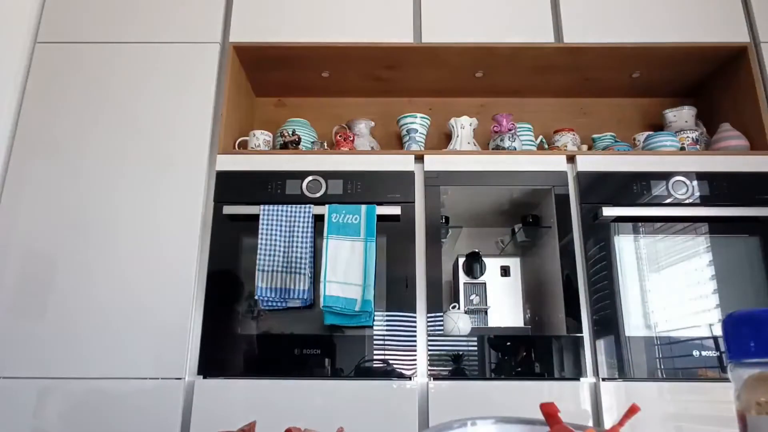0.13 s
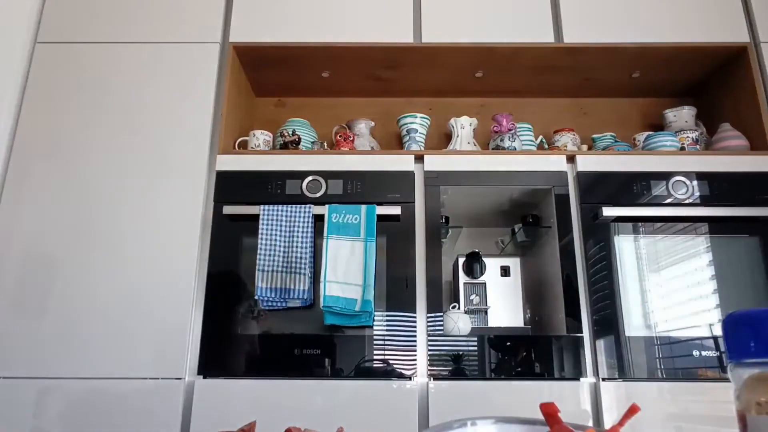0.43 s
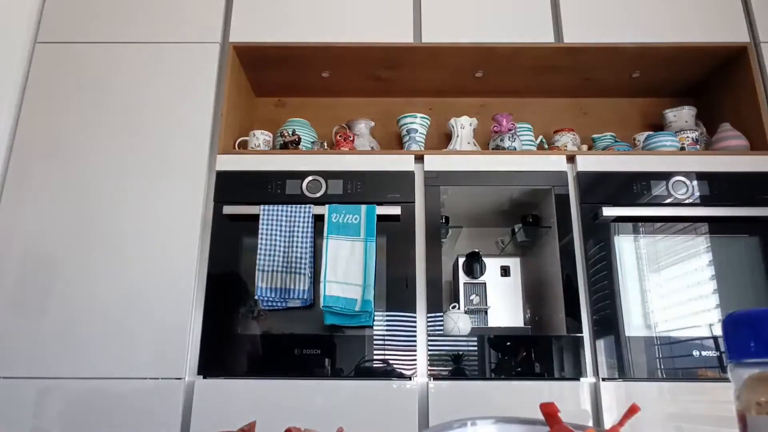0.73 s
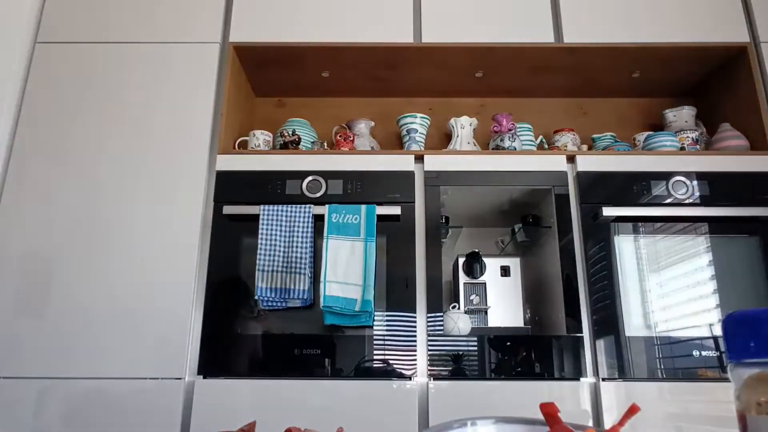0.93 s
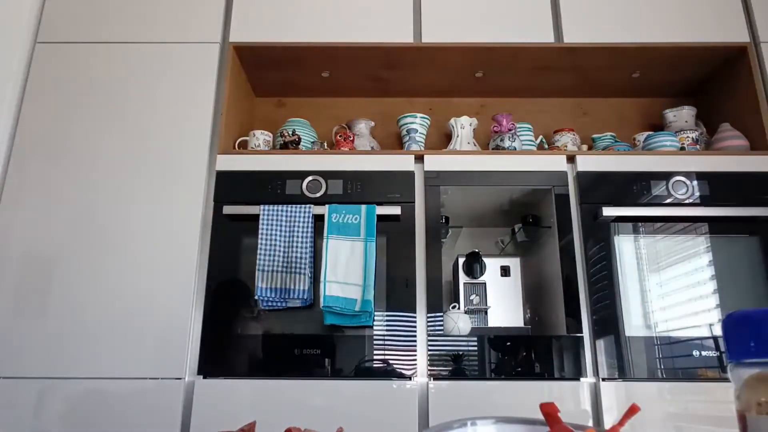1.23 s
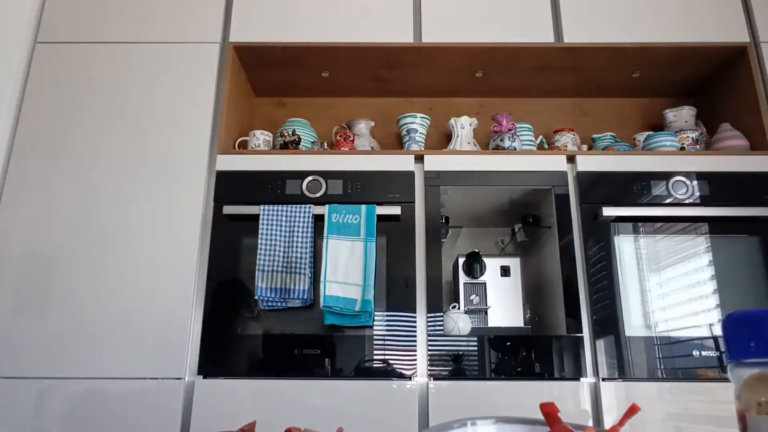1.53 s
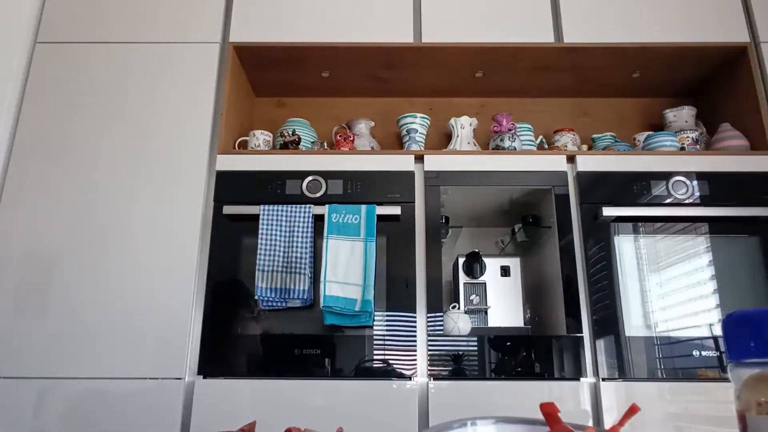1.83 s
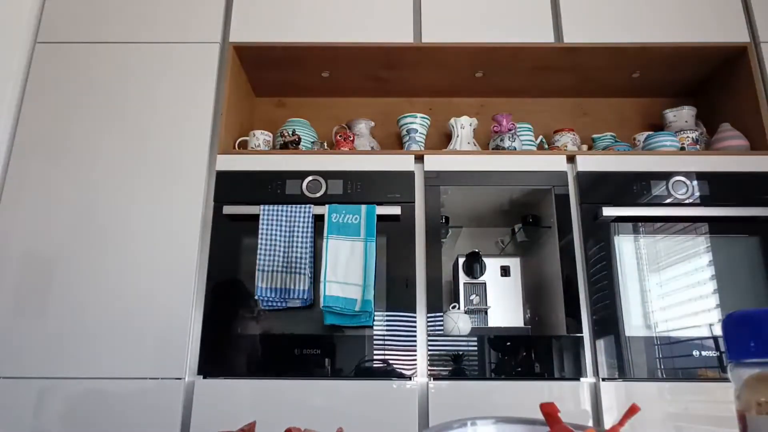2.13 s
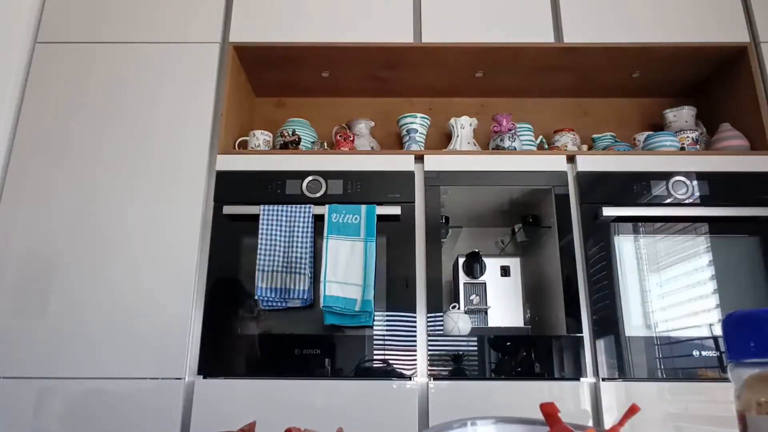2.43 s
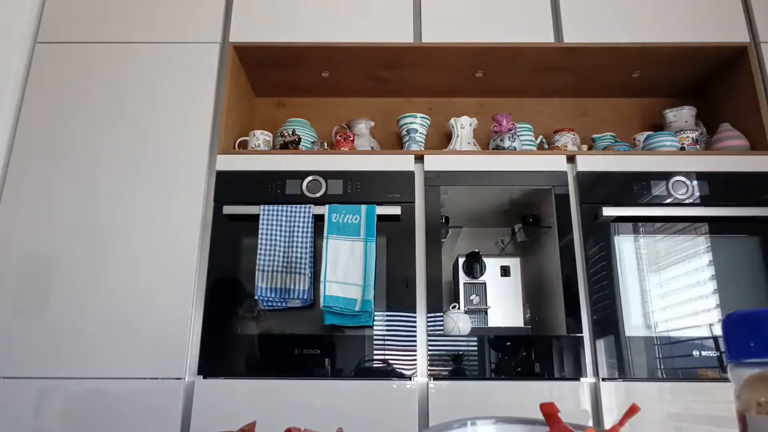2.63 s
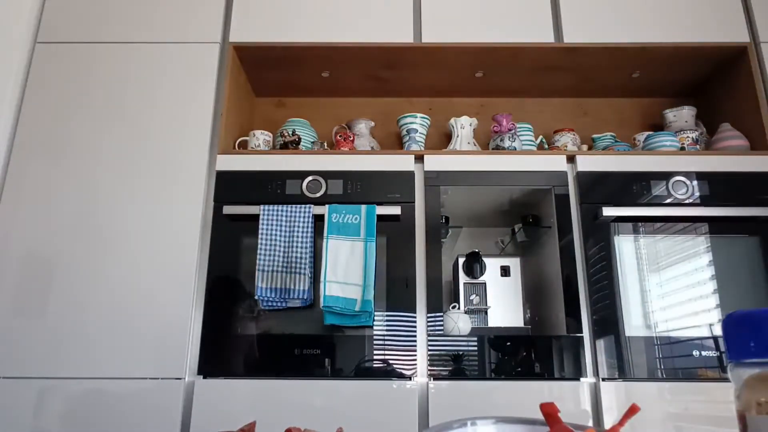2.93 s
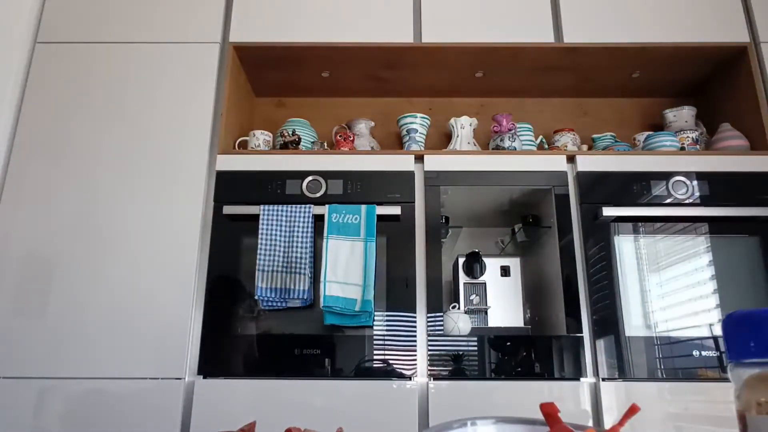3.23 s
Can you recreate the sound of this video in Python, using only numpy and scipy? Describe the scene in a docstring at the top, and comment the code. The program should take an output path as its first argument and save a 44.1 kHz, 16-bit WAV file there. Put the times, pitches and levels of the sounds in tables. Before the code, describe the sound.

A kitchen tap runs throughout into a steel sink, bright and hissy, with hands moving under it; small splashes, gurgles and soft drops thud on the basin. Close mono pickup in a small, hard-surfaced kitchen.

```python
"""In a small kitchen, a tap runs into a steel sink while hands are washed under it, in mono.
The aerated jet hisses as noise filled with tiny ringing droplets, with foam fizz and spray beside it.
On the hands it splashes and gurgles as gliding bubble tones in a wash of noise.
Run-off patters and drums on the basin, and gouts drop into it: blows ringing the modes of the steel.
A narrow hollow moves through the water, over a faint room rumble."""
import sys
import numpy as np
from scipy import signal
from scipy.fft import rfft, irfft, next_fast_len
from scipy.io import wavfile
from scipy.ndimage import uniform_filter1d, map_coordinates

SR = 44100
rng = np.random.default_rng(int(sys.argv[2]) if len(sys.argv) > 2 else 0)


def unload_wav(signal):
    """Save mono or channel-first audio to the path in sys.argv[1] as 16-bit WAV at rate SR, clipped to [-1, 1]."""
    wavfile.write(
        sys.argv[1],
        SR,
        np.round(np.clip(np.atleast_2d(signal).T, -1, 1) * 32767).astype(np.int16),
    )


N = 149940  # samples

# Level curves of the water, each trimmed again in its layer.
# The hiss of the aerated jet. Each row: time in seconds, level in dB before trim.
JET_LEVEL = [(0, -44), (0.13, -41), (0.35, -41.5), (0.45, -43.0), (0.59, -40.5), (0.68, -44.5), (0.78, -45),
             (0.92, -42), (1.03, -44.5), (1.1, -41.5), (1.29, -38.5), (1.42, -41), (1.48, -39.5),
             (1.76, -41), (1.82, -39), (1.9, -43), (2.12, -42.5), (2.19, -46.5), (2.45, -46), (2.59, -44),
             (2.68, -46), (2.87, -44.5), (3.02, -40.5), (3.18, -43.5), (3.4, -44)]
# Fizz of foam in the basin. Each row: time in seconds, level in dB before trim.
FIZZ_LEVEL = [(0, -43.5), (0.25, -38.5), (0.44, -43.5), (0.51, -39), (0.6, -42), (0.74, -45.0), (0.93, -41),
              (1.04, -46), (1.09, -42), (1.68, -42), (2.1, -43.5), (2.35, -48), (2.6, -41.5), (2.69, -46),
              (2.82, -44.5), (3.03, -40.5), (3.17, -42.5), (3.4, -41.5)]
# Spray thrown off the hands. Each row: time in seconds, level in dB before trim.
SPRAY_LEVEL = [(0, -46), (.12, -44.5), (.39, -47.5), (.43, -41), (.465, -46.5), (.495, -39), (.55, -41),
               (.64, -44.5), (.9, -46), (2.65, -44.5), (2.85, -44), (2.96, -45.5), (3.02, -41.5),
               (3.13, -46), (3.4, -45.5)]
# Bubbly splashing on the hands. Each row: time in seconds, level in dB before trim.
SPLASH_LEVEL = [(0.0, -55), (0.2, -53), (0.37, -56), (0.54, -55), (0.77, -58.5), (1.0, -60), (1.1, -57.5),
                (2.125, -58.5), (2.155, -50), (2.45, -52), (2.62, -55), (2.87, -50), (2.93, -55),
                (3.4, -57)]
# Larger bubbles gurgling between the palms. Each row: time in seconds, level in dB before trim.
GURGLE_LEVEL = [(0, -57.5), (0.28, -58.5), (0.39, -62), (0.57, -59), (0.84, -61), (0.93, -70),
                (0.97, -60.5), (1.05, -55.5), (1.13, -62), (1.3, -71), (1.36, -61.5), (1.71, -63),
                (1.8, -59.5), (1.99, -65.5), (2.05, -65), (2.24, -57.5), (2.31, -65), (2.46, -58.5),
                (2.77, -57), (3.02, -63.5), (3.4, -56.5)]
# Run-off pattering on the steel. Each row: time in seconds, level in dB before trim.
PATTER_LEVEL = [(0, -52), (0.45, -56.5), (0.57, -49.5), (0.7, -52), (0.8, -61), (0.85, -51), (0.93, -55),
                (1.0, -49.5), (1.115, -49), (1.15, -62), (1.23, -61), (1.28, -71), (1.42, -74), (1.54, -86),
                (1.62, -67), (1.77, -64), (1.85, -96), (1.88, -57), (2.16, -57.5), (2.24, -46.5),
                (2.35, -61.5), (2.46, -72), (2.52, -50), (2.64, -54.5), (2.72, -63), (2.91, -69.5),
                (3.05, -54.5), (3.22, -52), (3.4, -57.5)]
# The stream drumming mid-floor, dipping when the hands block it.
# Each row: time in seconds, level in dB before trim.
DRUM_LEVEL = [(0.0, -50.5), (0.25, -52), (0.44, -44.5), (0.48, -54), (0.6, -44.5), (0.74, -58), (0.97, -59),
              (1.06, -43), (1.22, -65.5), (1.34, -55.5), (1.77, -57), (1.85, -76), (1.89, -56), (2.0, -60),
              (2.15, -54.5), (2.32, -66), (2.4, -95), (2.61, -54.5), (2.75, -87), (2.84, -61.5),
              (2.88, -92), (2.97, -63), (3.07, -57), (3.18, -55), (3.27, -69), (3.4, -64.5)]
# Water deflected onto the edge of the floor. Each row: time in seconds, level in dB before trim.
EDGE_LEVEL = [(0.0, -54), (0.15, -49), (0.45, -57.5), (0.55, -47), (0.79, -58), (1.02, -52.5), (1.25, -57),
              (1.86, -89), (2.05, -58), (2.3, -57.5), (2.44, -94), (2.51, -55.5), (2.61, -50.5),
              (2.75, -83), (2.9, -73.5), (3.07, -54), (3.22, -53.5), (3.3, -75)]
# Gouts dropping from the hands. Each row: start in seconds, peak in dB before trim.
GOUT_DROPS = [(0.156, -48), (0.27, -50), (0.515, -45), (1.009, -43), (1.054, -39.5), (1.352, -58),
              (1.406, -55.5), (1.885, -48.5), (2.231, -40), (2.59, -46.5), (3.05, -47), (3.182, -49)]

# Modes of the middle of the basin floor. Each row: centre in Hz, width in Hz, strength in dB.
FLOOR_MODES = [(116.7, 11.5, -6), (130.8, 15.5, -1), (152, 19, 1)]
# Modes of the edge of the basin floor. Each row: centre in Hz, width in Hz, strength in dB.
EDGE_MODES = [(185, 15, 3), (217, 12.3, -5.5)]
# Modes of the basin walls. Each row: centre in Hz, width in Hz, strength in dB.
WALL_MODES = [(239, 32, -2.5), (344.7, 37, 0.5), (401, 11, 2.5), (440, 11.5, 2.5), (477, 18.5, -2),
              (545, 73, -3.5), (740, 49, -11)]
# High modes of the steel, kept ringing by splashes. Each row: centre in Hz, width in Hz, strength in dB.
STEEL_MODES = [(1690, 9.8, 3), (2677, 30, -9.5), (2818, 35, 3), (4090, 48, -11)]

# Colour of the jet's hiss. Each row: frequency in Hz, relative gain in dB.
HISS_COLOUR = [(1500, -71), (3000, -30), (6000, -7.5), (7300, 1.5), (8000, -4), (8600, -1.5), (9300, 1.5),
               (10500, 2), (11800, -1.5), (13300, -4), (14200, -7.5), (14650, 0), (15700, -10)]
# Colour of the foam. Each row: frequency in Hz, relative gain in dB.
FOAM_COLOUR = [(3000, -20.5), (4700, -13), (5300, -2.5), (5750, -3), (6400, 3), (6800, 3.5), (7300, -20),
               (8000, -27), (12000, -39)]
# Colour of the spray. Each row: frequency in Hz, relative gain in dB.
MIST_COLOUR = [(1200, -34), (2300, -9), (2780, -2.5), (3300, -2.5), (3750, -1.5), (4130, 1.5), (4500, -2),
               (5200, 1.5), (7000, -14.5), (12000, -25)]
# Colour of the splashing. Each row: frequency in Hz, relative gain in dB.
HAND_SPLASH_COLOUR = [(700, -54), (1150, -13), (1400, -3.5), (1650, -1), (1850, 0), (2100, 1), (2700, -5.5),
                      (4000, -7), (8000, -28)]
# Colour of the gurgling. Each row: frequency in Hz, relative gain in dB.
PALM_GURGLE_COLOUR = [(200, -29), (350, -6), (480, -4.5), (650, 1.5), (830, 3), (1000, -1), (1160, 2),
                      (1330, -9), (1700, -18.5), (3000, -11)]
# Colour of the room's faint rumble. Each row: frequency in Hz, relative gain in dB.
RUMBLE_COLOUR = [(20, -1), (70, 4), (110, -6), (1000, -46)]
# The shifting hollow in the water. Each row: time in seconds, centre in Hz, depth in dB (negative lifts).
HOLLOW_PATH = [(0.9, 1100, 3), (0.96, 1090, 28), (1.01, 1070, 27), (1.06, 1050, 7), (1.25, 1010, 13),
               (1.35, 940, 10), (1.5, 970, 10), (1.84, 990, 12), (2.02, 1050, 18), (2.12, 1270, 13),
               (2.17, 1250, 4), (2.35, 940, -2), (2.52, 1190, 12), (2.78, 1000, -7.5), (3.03, 945, 26),
               (3.13, 940, 14), (3.4, 1050, 5)]

# Cycles are counted over a 60 dB decay; the last setting is dB over the noise, before colouring.
DROPS_PER_S, DROP_CYCLES, DROPS_DB = 7000, 7.1, -3.5
BUBBLES_PER_S, BUBBLE_CYCLES, BUBBLES_DB = 880, 72, -10
BUBBLE_RISE = 0.12  # pitch gains twice this fraction over the 60 dB decay
SIZE_SPREAD_DB = 2.5  # mean of the exponential spread of grain sizes
GOUT_SPLAT_S, GOUT_SPLAT = 0.097, 0.11  # 60 dB decay; later blows against the first
HOLLOW_WIDTH_OCT, HOLLOW_WANDER_OCT = 0.13, 0.03  # half width, random wander
ROOM_T60_S, ROOM_DB, ROOM_TONE_DB = 0.069, -9, -85
TOP_HZ = 15800


def amp(db):
    """Decibels to gain."""
    return 10 ** (np.asarray(db) / 20)


def unit(x):
    """x at rms 1."""
    return x / np.sqrt(np.mean(x ** 2) + 1e-20)


def level(rows):
    """Gain per sample, drawn through (s, dB) rows."""
    return amp(np.interp(np.arange(N) / SR, *np.transpose(rows)))


def wobble(rate):
    """A smooth random curve with rate knots a second."""
    knots = rng.standard_normal(int(N * rate / SR) + 4)
    return map_coordinates(knots, [np.arange(N) * rate / SR])


def filtered(x, response):
    """x through a given response of frequency."""
    m = next_fast_len(N + SR // 2)
    hz = np.fft.rfftfreq(m, 1 / SR)
    return irfft(rfft(x, m) * response(hz), m)[..., :N]


def coloured(x, points):
    """x shaped by a colour curve and a gentle low cut, at rms 1."""
    hz, db = np.transpose(points)

    def response(f):
        low_cut = f ** 2 / (f ** 2 + (hz[0] / 2) ** 2)
        return amp(np.interp(np.log(f + 1), np.log(hz), db)) * low_cut

    return unit(filtered(x, response))


def ringing(x, modes, low_hz, high_hz):
    """x excites resonances of alternating sign that radiate mainly between two frequencies."""
    def response(f):
        total = 0
        for k, (centre, width, db) in enumerate(modes):
            damping = 1j * f * width
            total = total + (-1) ** k * amp(db) * damping / (centre * centre - f * f + damping)
        return total

    radiation = signal.butter(2, [low_hz, high_hz], "bandpass", fs=SR, output="sos")
    return signal.sosfilt(radiation, filtered(x, response))


def grains(rate, low_hz, high_hz, cycles, spread_db, rise):
    """A shower of damped tones, which glide up as bubbles near the surface when rise is above 0."""
    when, pitch, size = rng.random((int(rate * N / SR), 3)).T[:, :, None]
    hz = low_hz + (high_hz - low_hz) * pitch
    n = np.arange(int(min(cycles / low_hz, .03) * SR))  # at most 30 ms of each tone
    age = n / SR * hz / cycles  # 1 once the tone is 60 dB down
    strength = amp(-spread_db * np.log(1 - .995 * size) - 60 * age) * np.sqrt(hz)
    tone = strength * np.sin(2 * np.pi * cycles * age * (1 + rise * age))
    place = (when * N).astype(int) + n
    return unit(np.bincount(place.ravel(), tone.ravel(), N)[:N])


def impacts(rate, spread_db):
    """Blows of falling water at random moments, their sizes spread evenly in dB."""
    when, size = rng.random((int(rate * N / SR), 2)).T
    blows = np.bincount((when * N).astype(int), amp(spread_db * size), N)
    return blows - blows.mean()


def patchy(x, depth_db, size):
    """The colour shifts at random as the water finds new paths; size is the smoothing in bins."""
    z = signal.stft(x, nperseg=1024)[2]
    field = rng.standard_normal(z.shape)
    for _ in range(2):
        field = uniform_filter1d(field, size=size, axis=0)
        field = uniform_filter1d(field, size=7, axis=1)
    return unit(signal.istft(z * amp(depth_db * unit(field)), nperseg=1024)[1][:N])


def kitchen(x):
    """Direct sound plus the short, decaying answer of hard cupboards, at rms 1."""
    t = np.arange(SR // 3) / SR
    tail = rng.standard_normal(len(t)) * amp(-60 * t / ROOM_T60_S) * (t > .002)
    wet = signal.fftconvolve(x, tail / np.linalg.norm(tail))[:N]
    return unit(x + amp(ROOM_DB) * wet)


def room_tone():
    """Low, steady coloured noise: the faint rumble of the room."""
    return amp(ROOM_TONE_DB) * coloured(rng.standard_normal(N), RUMBLE_COLOUR)


def sink(drum_db=0.15, edge_db=0.35, patter_db=-2.8, glug_db=1.0):
    """Water falls in short glugs that drum the basin floor, and patters on its walls."""
    drum = unit(ringing(impacts(900, spread_db=0.5), FLOOR_MODES, 56, 186))
    edge = unit(ringing(impacts(900, spread_db=10), EDGE_MODES, 136, 355))
    wall_blows = ringing(impacts(900, spread_db=7), WALL_MODES, 182, 640)
    patter = patchy(wall_blows, depth_db=2.0, size=3)
    floor = amp(drum_db) * level(DRUM_LEVEL) * drum + amp(edge_db) * level(EDGE_LEVEL) * edge
    glugs = amp(glug_db * wobble(45))
    return glugs * floor + amp(patter_db) * level(PATTER_LEVEL) * patter


def gouts(gout_db=-1, walls_db=2):
    """Each gout lands as a soft blow and a brief splatter that ring the whole basin."""
    out, t = np.zeros(N), np.arange(N) / SR
    blow = signal.unit_impulse(N)
    basin = ringing(blow, FLOOR_MODES + EDGE_MODES, 102, 400)
    basin = basin + amp(walls_db) * ringing(blow, WALL_MODES, 237, 830)
    for s, db in GOUT_DROPS:
        splat = blow + GOUT_SPLAT * rng.standard_normal(N) * amp(-60 * t / GOUT_SPLAT_S)
        thud = signal.fftconvolve(splat[:SR // 8], basin[:SR // 4])
        thud = amp(db + gout_db) * thud / np.abs(thud).max()
        start = round(s * SR)
        out[start:start + len(thud)] += thud[:N - start]
    return out


def slosh(colour, low_hz, high_hz, patchy_db):
    """Trapped bubbles ring and glide up in a wash of water."""
    bubbles = grains(BUBBLES_PER_S, low_hz, high_hz, BUBBLE_CYCLES, SIZE_SPREAD_DB, BUBBLE_RISE)
    wash = coloured(rng.standard_normal(N) + amp(BUBBLES_DB) * bubbles, colour)
    return kitchen(patchy(wash, patchy_db, size=5))


def hands(splash_db=-0.06, gurgle_db=-1.0, steel_db=-7):
    """Water sloshing over the hands traps small and large bubbles; its splashes ring the steel."""
    splash = amp(splash_db) * slosh(HAND_SPLASH_COLOUR, 1422, 3770, patchy_db=0.75)
    steel = amp(steel_db) * unit(ringing(impacts(1500, spread_db=7), STEEL_MODES, 1530, 4400))
    gurgle = amp(gurgle_db) * slosh(PALM_GURGLE_COLOUR, 380, 1506, patchy_db=2.5)
    return level(SPLASH_LEVEL) * (splash + steel) + level(GURGLE_LEVEL) * gurgle


def droplets(colour, low_hz, high_hz):
    """Dense bursts of tiny ringing droplets over a smooth rush."""
    drops = grains(DROPS_PER_S, low_hz, high_hz, DROP_CYCLES, SIZE_SPREAD_DB, rise=0)
    rush = coloured(rng.standard_normal(N) + amp(DROPS_DB) * drops, colour)
    return kitchen(patchy(rush, depth_db=1.2, size=5))


def jet(jet_db=1.48, fizz_db=-1.6, spray_db=0.3, flutter_db=0.56, flutter_rate=25):
    """The aerated stream hisses; its fizz and spray each flutter a little."""
    hiss = amp(jet_db) * level(JET_LEVEL) * droplets(HISS_COLOUR, 4200, 16300)
    fizz_gain = amp(fizz_db + flutter_db * wobble(flutter_rate)) * level(FIZZ_LEVEL)
    spray_gain = amp(spray_db + flutter_db * wobble(flutter_rate)) * level(SPRAY_LEVEL)
    fizz = fizz_gain * droplets(FOAM_COLOUR, 5230, 6150)
    spray = spray_gain * droplets(MIST_COLOUR, 2120, 7540)
    return hiss + fizz + spray


def hollowed(x):
    """Echoes off the moving hands cancel a narrow band that shifts, fades and at times lifts."""
    hz, s, z = signal.stft(x, SR, nperseg=2048, noverlap=1792)
    times, centres, depths = np.transpose(HOLLOW_PATH)
    wander = HOLLOW_WANDER_OCT * np.interp(s * SR, np.arange(N), wobble(18))
    octaves = np.log2((hz[:, None] + 1) / np.interp(s, times, centres)) + wander
    notch_db = -np.interp(s, times, depths) * np.exp(-(octaves / HOLLOW_WIDTH_OCT) ** 2)
    return signal.istft(z * amp(notch_db), SR, nperseg=2048, noverlap=1792)[1][:N]


def scene():
    """The hollowed water over the room tone, the same in both ears."""
    water = jet() + hands() + sink() + gouts()
    mono = hollowed(water) + room_tone()
    return np.array([mono, mono])


def record(dry):
    """Nothing is kept above the top frequency."""
    return filtered(dry, lambda hz: hz < TOP_HZ)


dry = scene()
out = record(dry)
unload_wav(out)
```